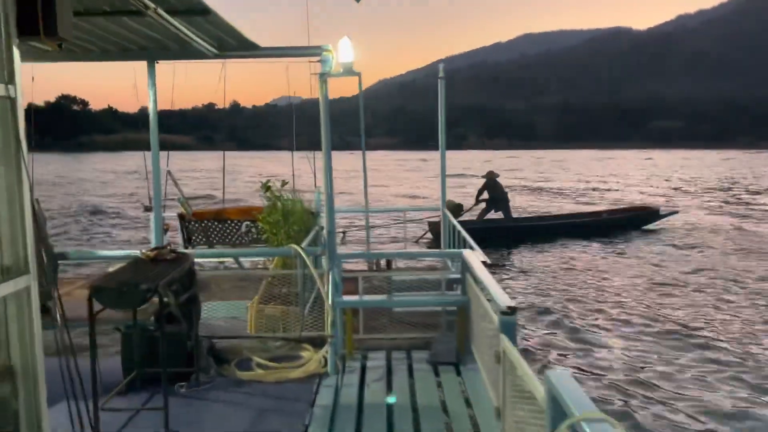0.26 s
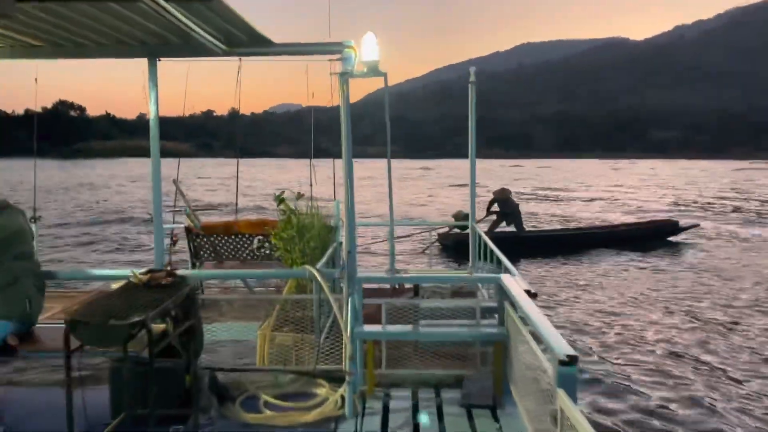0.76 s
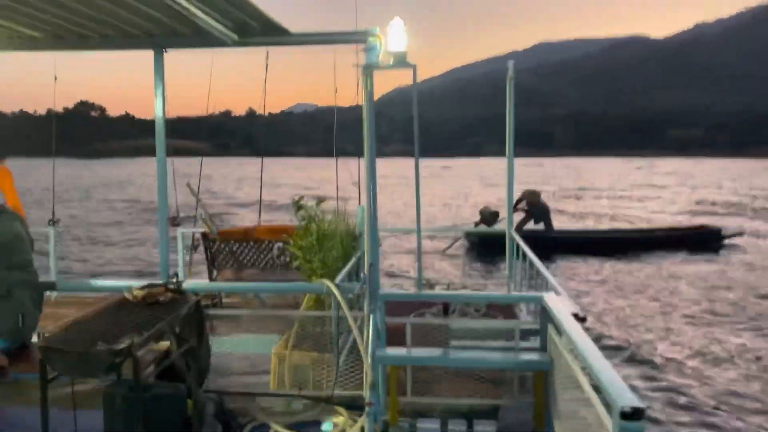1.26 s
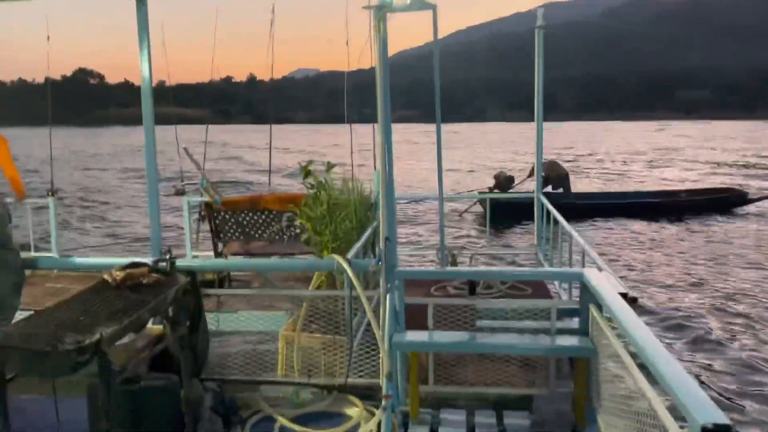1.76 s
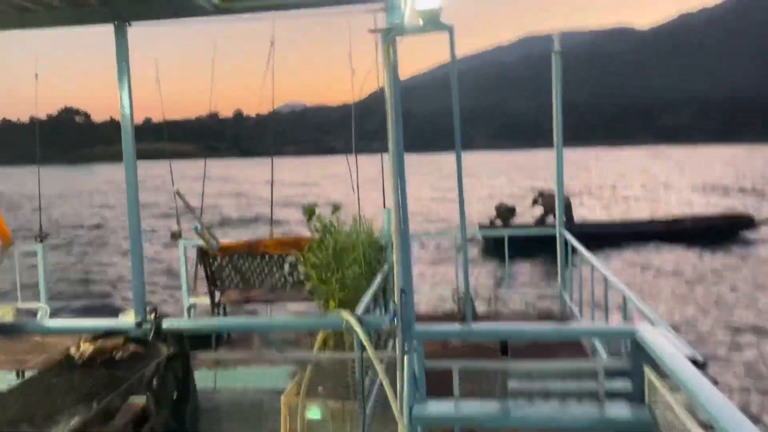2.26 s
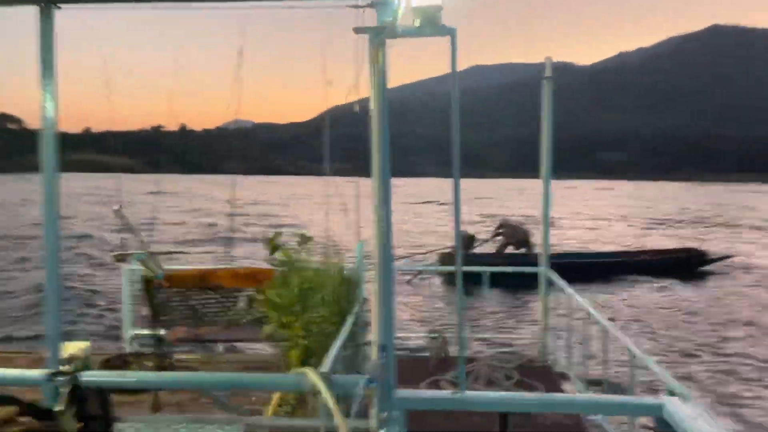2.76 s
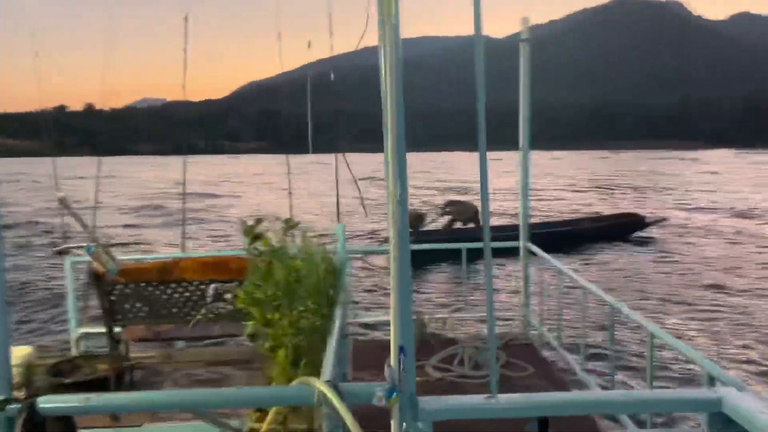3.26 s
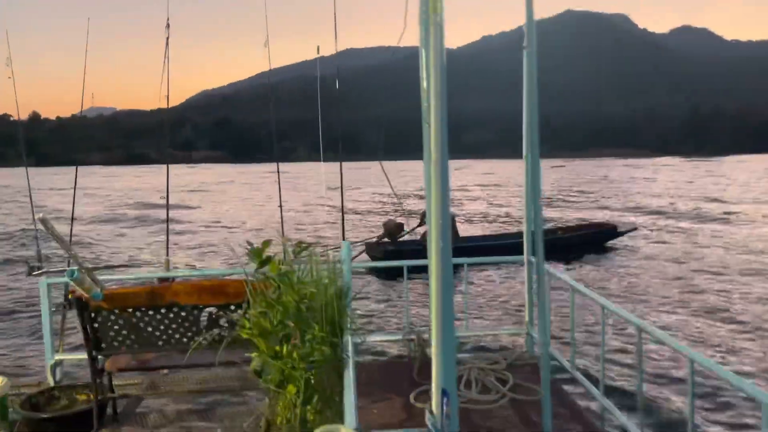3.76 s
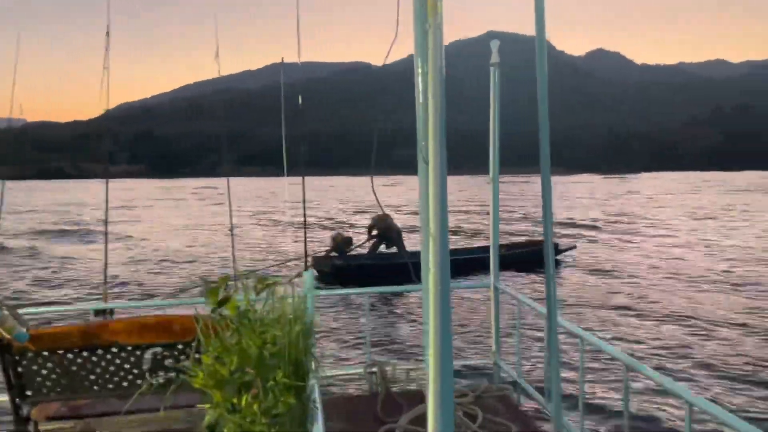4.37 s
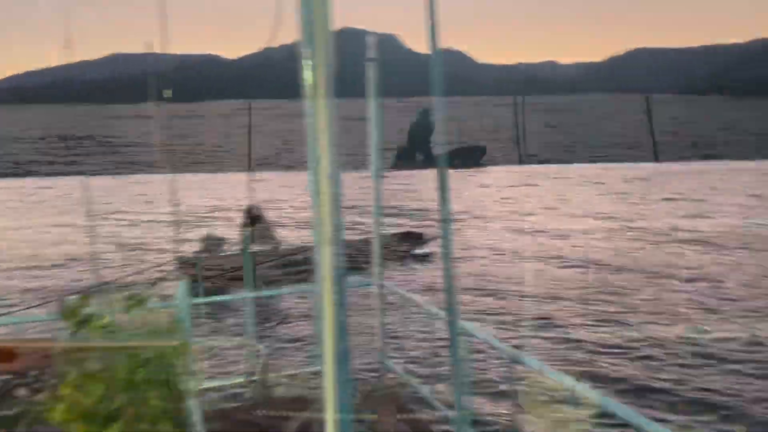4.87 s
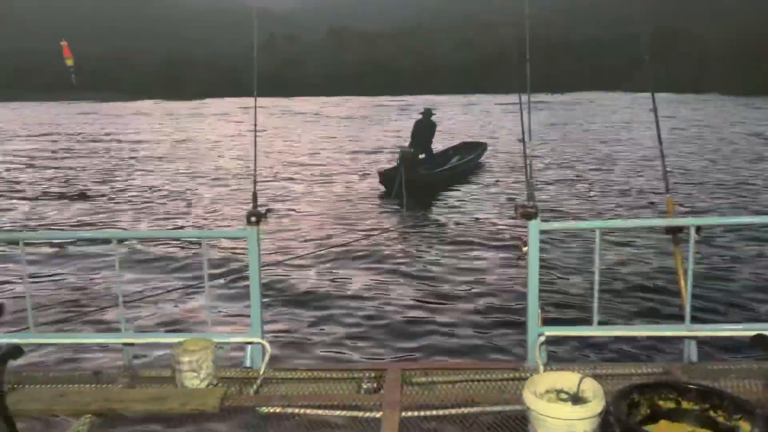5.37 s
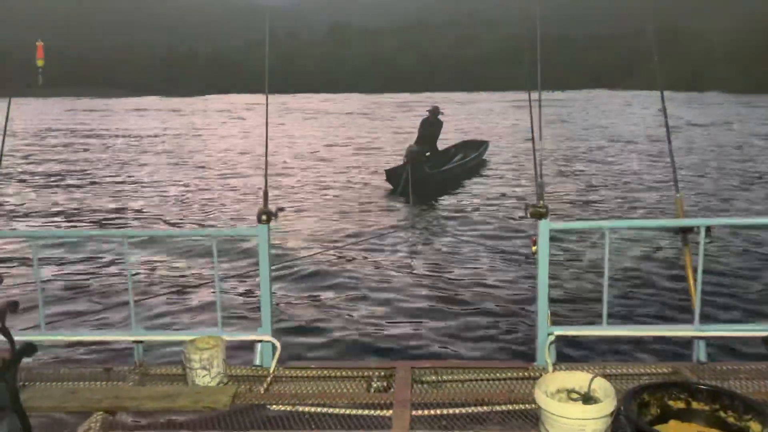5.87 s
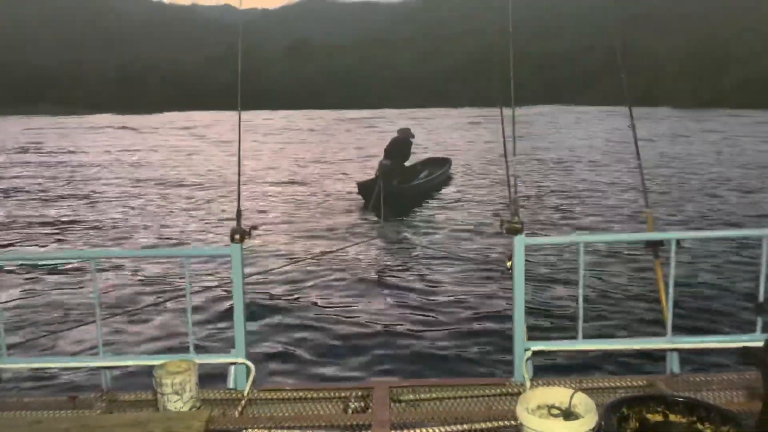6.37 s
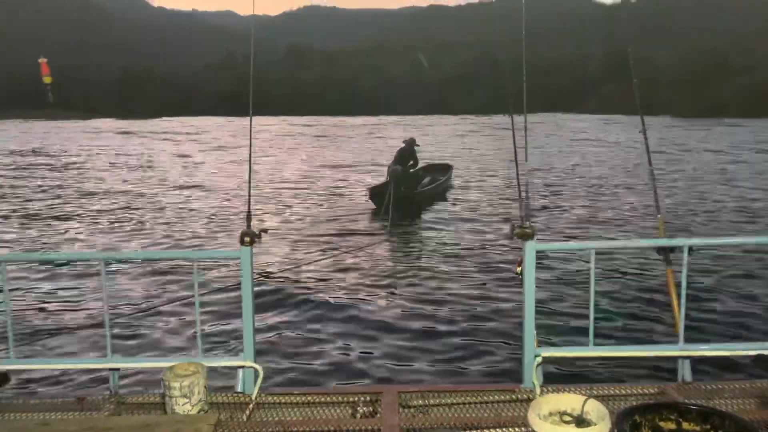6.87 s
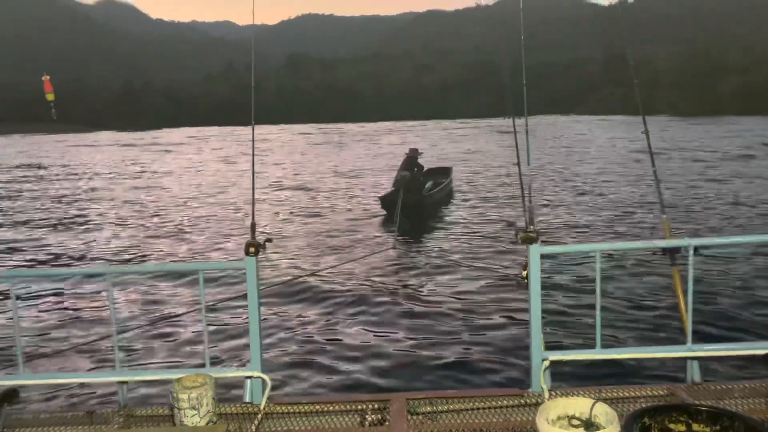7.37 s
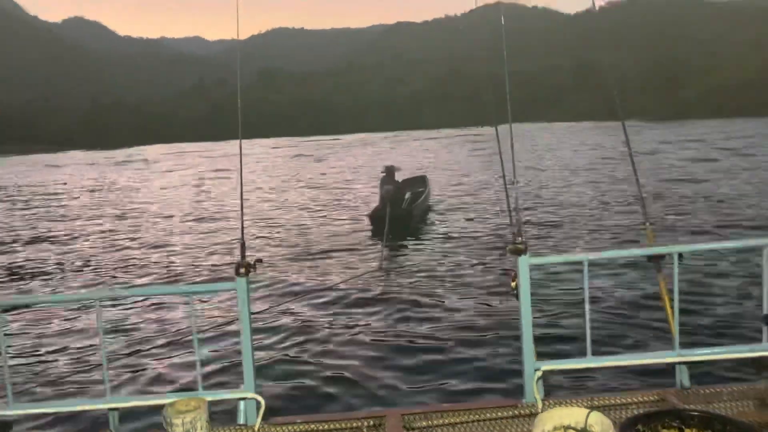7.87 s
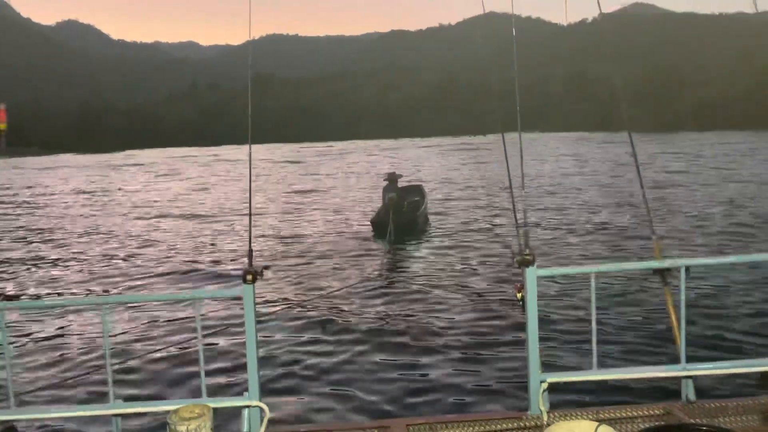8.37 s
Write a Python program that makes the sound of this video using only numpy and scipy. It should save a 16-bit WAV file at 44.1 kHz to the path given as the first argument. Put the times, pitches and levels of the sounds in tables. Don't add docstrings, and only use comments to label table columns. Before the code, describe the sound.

On the deck of a towed raft, a stereo microphone hears a boat motor chugging across open water: rapid, slightly uneven cracks, ringing metal, shaft hum and short exhaust thumps. Loose fittings knock softly now and then. The motor eases off before five seconds, then blends into a louder, rounder, bassier putter facing the pipe, dipping and briefly surging near the end. Spray, wash and wind rumble continue throughout.

```python
import sys
import numpy as np
from scipy import signal
from scipy.fft import rfft, irfft, next_fast_len
from scipy.io import wavfile
from scipy.ndimage import uniform_filter1d

SR = 44100
rng = np.random.default_rng(int(sys.argv[2]) if len(sys.argv) > 2 else 0)


def to_wav(s):
    ch = np.atleast_2d(s).T
    pcm = np.round(np.clip(ch, -1, 1) * 32767)
    wavfile.write(sys.argv[1], SR, pcm.astype(np.int16))


def boost_factor(decibels):
    exponent = np.asarray(decibels, float) / 20
    return 10 ** exponent


N = 380141

# f/Hz, phase/rad
LEAD_SIDE = [(0, 0), (780, 0.3), (2070, -0.4), (2760, 0.3), (8180, 0.3), (8790, -0.3), (9730, -2.5),
             (10600, -3.5), (11700, -6.1), (12700, -6.6), (13400, -9.3), (14200, -9.4), (15200, -12.4),
             (16700, -12.8)]
# f/Hz, level/dB
TILT_SIDE = [(60, 0.59), (180, 0), (550, 0.37), (1650, 1.0), (4970, 1.0), (15000, 0.58)]
# f/Hz, likeness/0..1
DIRECT = [(60, .95), (500, .96), (1300, .85), (2500, .92), (6000, .86), (8500, .995)]


def engine_side():
    # t/s, rate/(firings per s)
    speed = [(.0417, 19.037), (1.287, 19.713), (2.009, 17.84), (2.392, 17.94), (3.405, 17.597),
             (4.279, 16.764), (4.463, 15.896), (4.635, 13.516), (4.87, 12.322)]
    # t/s, exhaust pulse level/dB, gas crack level/dB, crack fullness/dB
    effort = [
        (.04, 0.5, -12, -12),
        (.75, -0.5, -11.5, -10.5),
        (1.4, -1.5, -11.5, -12),
        (2.0, -2.5, -17, -8),
        (2.8, -1.5, -12, -14.5),
        (3.4, -.6, -15.5, -8.5),
        (4.2, -0.5, -13.5, -11.5),
        (4.45, -1, -19, -7.5),
        (4.65, -1.5, -32.5, -17),
    ]
    # crack/dB, fullness/dB
    uneven = (1.3, 1.2)
    # f/Hz, level/dB
    colour = [(400, -10), (750, -12), (1000, -15.5), (2000, -6), (4000, -3), (4500, -3), (6500, -8.5),
              (8000, -6), (9300, -3.5), (10300, 8.5), (11500, -2), (12500, -14.5), (13800, -24),
              (15400, -29.5), (16700, -52)]
    # (f/Hz, width/Hz, level/dB)
    rings = [
        (0, [(2730, 320, 3.5), (5100, 140, -10), (5800, 52, 12), (7300, 1900, 0)]),
        (1.2, [(4950, 790, -38), (7700, 130, 12), (8520, 240, 9.5), (9470, 370, 8.5)]),
        (2.55, [(2280, 180, 1), (3900, 370, 12), (6030, 320, 8.5), (7500, 490, 0)]),
        (3.22, [(2850, 150, 0), (4570, 110, -20), (6300, 270, 5), (8700, 310, -0.5)]),
    ]
    # f/Hz, level/dB, t60/s, sign
    pipe = [(91.5, -24.3, .07, 1), (194, -13.9, .016, 1), (359, -30.3, .035, -1)]
    # delay/s, f/Hz, length/cycles, level/dB
    knocks = [
        (.0003, 390, .5, -19.5),
        (.0065, 89, .39, -22),
    ]
    multiples = [9, 13, 15, 16, 19, 21, 24, 27, 30, 33]
    hum_db = [-46, -52, -44, -50, -45, -50, -49, -46, -51, -53]
    fired = firings(speed, effort, uneven)
    gas = cracks(fired, colour, rings, rise_s=0.0022, fall_s=0.0027, tail_db=-8.5, tail_s=0.012,
                 crack_db=-2.0, ring_db=-3.5)
    pulses = thumps(fired, pipe, knocks, delay_s=.0082, soft_s=.0002, vary=.008)
    body = driven(hum(pulses, fired, multiples, hum_db), effort)
    return ports(gas + body, DIRECT, LEAD_SIDE, TILT_SIDE)


def engine_behind():
    # t/s, rate/(firings per s)
    speed = [(4.874, 17.021), (5.217, 16.785), (5.695, 17.02), (5.879, 17.61), (7.031, 17.275),
             (7.584, 17.604), (7.806, 16.179), (8.356, 18.865), (8.627, 17.984)]
    # t/s, exhaust pulse level/dB, gas crack level/dB, crack fullness/dB
    effort = [
        (4.87, -18, -26.5, -9),
        (5.05, -4.5, -16.5, -5),
        (5.3, 2, -10, -4.5),
        (5.85, 0.7, -10.5, -3.5),
        (6.4, -0.5, -13.5, -7),
        (6.85, 0, -11, -8),
        (7.65, -0.5, -16.5, -7.5),
        (8.0, 0.5, -9, -6.5),
        (8.6, .6, -12, -3),
    ]
    # crack/dB, fullness/dB
    uneven = (1.1, 1.2)
    # f/Hz, level/dB
    colour = [(400, 0.5), (800, -1.5), (1000, -5), (2000, 1), (4000, 5), (4500, -5), (6500, -3.5),
              (8000, -8), (9300, -0.5), (10300, 5), (11500, -5.5), (12500, -19.5), (13800, -26),
              (15400, -37), (16700, -60)]
    # (f/Hz, width/Hz, level/dB)
    rings = [
        (4.8, [(978, 80, 5), (2155, 93, 5), (5570, 160, 7), (7850, 98, 6), (8930, 420, -2)]),
        (6.2, [(983, 60, 8), (2010, 500, 11), (4520, 170, 12), (7150, 170, -20), (7800, 390, 6)]),
        (7.7, [(1357, 81, 8.5), (3340, 240, -14), (5900, 330, -2), (8360, 300, -2)]),
    ]
    # f/Hz, level/dB, t60/s, sign
    pipe = [(91.4, -15.2, .09, 1), (154, -9.3, .05, 1), (337, -6.5, .12, -1)]
    # delay/s, f/Hz, length/cycles, level/dB
    knocks = [
        (.0004, 575, 1.0, -18.5),
        (.0065, 126, .43, -18.8),
    ]
    multiples = [9, 13, 15, 17, 20, 27]
    hum_db = [-45, -47, -51, -52, -51, -57]
    # f/Hz, phase/rad
    lead_behind = [(0, 0), (1460, -0.1), (3190, 1.2), (6120, 0.2), (7920, 0.7), (8790, -0.3), (9730, -2.3),
                   (11700, -5.9), (12700, -6.7), (13400, -9.4), (14500, -9.6), (15200, -12.7),
                   (15700, -12.5), (16700, -13.5)]
    # f/Hz, level/dB
    tilt_behind = [(60, 0.3), (130, -1.5), (290, 2), (640, -0.2), (1410, -5), (3100, 0.8), (6820, 3),
                   (15000, -2)]
    fired = firings(speed, effort, uneven)
    gas = cracks(fired, colour, rings, rise_s=0.0025, fall_s=0.0037, tail_db=-13.5, tail_s=0.017,
                 crack_db=-1.5, ring_db=-3.0)
    pulses = thumps(fired, pipe, knocks, delay_s=.0084, soft_s=.0013, vary=.01)
    body = driven(hum(pulses, fired, multiples, hum_db), effort)
    return ports(gas + body, DIRECT, lead_behind, tilt_behind)


def firings(speed, effort, uneven):
    s, rate = np.transpose(speed)
    t = np.arange(s[0], s[-1], 1 / SR)
    cycles = np.cumsum(np.interp(t, s, rate)) / SR
    times = np.interp(np.arange(int(cycles[-1]) + 1), cycles, t)
    at, _, crack_db, full_db = np.transpose(effort)
    luck = rng.standard_normal((len(times), 2)).clip(-2, 2) * uneven
    high_db = np.interp(times, at, crack_db) + luck[:, 0]
    low_db = high_db + np.interp(times, at, full_db) + luck[:, 1] - luck[:, 0] / 2
    return np.transpose([times, high_db, low_db])


def cracks(fired, colour, rings, rise_s, fall_s, tail_db, tail_s, crack_db, ring_db):
    t = np.arange(3000) / SR
    rise = np.sin(np.pi / 2 * np.clip(t / rise_s, 0, 1)) ** 2
    late = np.maximum(t - rise_s, 0)
    burst, tail = np.exp(-2 * late / fall_s), boost_factor(2 * tail_db) * np.exp(-2 * late / tail_s)
    shape = rise * np.sqrt(burst + tail)
    gas = noise(colour, patchy_db=2.8, flicker_db=.3, size=256)
    above_4500 = signal.firwin(255, 4500, pass_zero=False, fs=SR)
    high = signal.oaconvolve(gas, above_4500[None], "same")
    low = gas - high
    gate = np.zeros((2, N))
    for s, high_db, low_db in fired:
        add(gate, s - .003, boost_factor([[high_db], [low_db]]) * shape)
        leak = boost_factor(low_db - 22.5) * np.hanning(500)
        add(gate[1], max(s - .012, 0), leak)
    out = boost_factor(crack_db) * (gate[0] * evened(high) + gate[1] * evened(low))
    starts = [round(s * SR) for s, _ in rings] + [N]
    for a, b, (_, modes) in zip(starts, starts[1:], rings):
        ring = np.zeros(len(t))
        for hz, width, db in modes:
            decay = np.exp(-np.pi * width * t)
            ring += boost_factor(db + ring_db) * width / SR * decay * np.cos(2 * np.pi * hz * t)
        add(out, a / SR, signal.oaconvolve(out[:, a:b], 2 * np.pi * ring[None]))
    return out


def thumps(fired, pipe, knocks, delay_s, soft_s, vary):
    t, out = np.arange(5000) / SR, np.zeros(N)
    puff = np.exp(-.5 * ((t[:400] - t[200]) / soft_s) ** 2)
    puff /= puff.sum()
    for s, crack_db, _ in fired:
        luck = rng.standard_normal(5)
        ring = np.zeros(len(t))
        for k, (hz, level, t60, sign) in enumerate(pipe):
            tuned = hz * (1 + vary * luck[k])
            ring += sign * boost_factor(level - 60 * t / t60) * np.sin(2 * np.pi * tuned * t)
        add(out, s + delay_s - t[200], np.convolve(ring, puff))
        idle_db = .9 * min(crack_db + 19, 0)
        for k, (late, hz, cycles, level) in enumerate(knocks):
            u = (t[:1200] - t[600]) * hz * (1 + 2 * vary * luck[3 + k])
            kick = np.cos(2 * np.pi * u) * np.exp(-(u / cycles) ** 2)
            add(out, s + late - t[600], -boost_factor(level + idle_db * (k == 0)) * kick)
    return out


def hum(pulses, fired, multiples, hum_db):
    # t/s, level/dB
    shaft_load = [
        (0, -4),
        (1.5, -1),
        (3, -5),
        (4.4, -2),
        (4.7, -10),
        (5.2, 6.5),
        (6.2, 3.5),
        (7.8, 3.5),
        (8.6, 2),
    ]
    out, times = pulses.copy(), fired[:, 0]
    turns = np.interp(np.arange(N) / SR, [times[0] - .054, *times], np.arange(len(times) + 1))
    running = uniform_filter1d(np.gradient(turns) > 0, size=2000, output=float)
    strength = running * curve(shaft_load, column=1)
    for multiple, db in zip(multiples, hum_db):
        spin = np.exp(2j * np.pi * multiple * turns)
        in_step = np.vdot(spin, out * running)
        drift = np.interp(np.arange(N), np.linspace(0, N, 40), rng.standard_normal(40))
        tone = np.sqrt(2) * boost_factor(db) * (spin * in_step / abs(in_step)).real
        out += strength * boost_factor(1.8 * drift) * tone
    return out


def driven(body, effort):
    low_cut = signal.butter(3, 60, "high", fs=SR, output="sos")
    return signal.sosfilt(low_cut, body * curve(effort, column=1)) * np.array([[1], [.5]])


def deck():
    # t/s, f/Hz, peak level/dB, t60/s
    bumps = [(1.155, 85, -49, 0.22), (1.573, 150, -21, 0.068), (1.605, 279, -19, 0.098),
             (1.874, 270, -19, 0.14), (1.93, 249, -23, .1), (2.169, 103, -17, 0.21),
             (2.328, 103, -21, 0.39), (3.698, 76.4, -26, 0.33), (3.928, 79.5, -18, 0.099),
             (5.623, 990, -25, .06), (5.641, 977, -15, 0.079)]
    t, out = np.arange(12000) / SR, np.zeros((2, N))
    for s, hz, db, t60 in bumps:
        soft_start = 1 - np.exp(-t * hz)
        add(out[0], s, soft_start * boost_factor(db - 60 * t / t60) * np.sin(2 * np.pi * hz * t))
    return out


def water():
    # t/s, level/dB
    nearness = [
        (0, 0.5),
        (1.4, -1.5),
        (2.9, 2),
        (4.1, 0.5),
        (4.75, -5.5),
        (5.3, 1.5),
        (5.8, 3.5),
        (6.3, 0),
        (8.62, 0.5),
    ]
    # f/Hz, level/dB
    spray_colour = [(1500, -16.5), (3000, -18), (5000, -14), (8000, -15.5), (9300, -10), (10300, 0),
                    (11500, -20), (12500, -58), (13500, -55)]
    # f/Hz, level/dB
    wash_colour = [(300, 5), (600, 2), (800, -8.5), (980, -3.5), (1100, -1.5), (1500, -6), (2200, -7),
                   (3500, -15), (6000, -54)]
    near = curve(nearness, column=1)
    hiss = boost_factor(-37.5) * near * noise(spray_colour, patchy_db=4.5, flicker_db=1.0)
    wash = boost_factor(-37.5) * near ** 0.65 * noise(wash_colour, patchy_db=1.0, flicker_db=3.0)
    return hiss + wash


def wind():
    # t/s, length/s, level over the calm/dB
    gusts = [(.4, .5, 3.5), (.95, 0.39, 7), (1.177, 0.052, 3.5), (1.56, 0.27, 2.5), (1.91, 0.091, 8.5),
             (2.25, 0.5, 3), (3.032, 0.12, 6), (3.71, .12, 1), (3.9, 0.23, 3), (4.38, .2, 5),
             (4.75, .4, -5), (5.75, 0.41, 3.5), (7.97, 0.38, -1)]
    # f/Hz, level/dB
    rumble_colour = [(28, -34), (48, -3), (70, 0), (130, -4), (200, -9), (400, -20), (630, -22), (800, -30),
                     (1200, -40)]
    t = np.arange(N) / SR
    level_db = np.full(N, -36.5)
    for s, length, db in gusts:
        level_db += db * np.exp(-(2 * (t - s) / length) ** 2)
    return boost_factor(level_db) * noise(rumble_colour, patchy_db=2.0, flicker_db=2.5, size=1024)


def noise(colour, patchy_db, flicker_db, size=512):
    hop = size // 4
    frames, hz = N // hop + 5, np.fft.rfftfreq(size, 1 / SR)
    a, b, c, d, patches = rng.standard_normal((frames, len(hz), 5)).T
    patches = uniform_filter1d(patches, size=6, axis=0)
    patches = evened(uniform_filter1d(patches, size=16, axis=1))
    flicker = evened(uniform_filter1d(rng.standard_normal(frames), size=4))
    level_db = read(colour, hz)[:, None] + patchy_db * patches + flicker_db * flicker
    z = np.array([a + 1j * b, c + 1j * d]) * boost_factor(level_db)
    return evened(signal.istft(z, nperseg=size, noverlap=size - hop)[1][:, :N])


def ports(x, likeness, lead, tilt):
    size = next_fast_len(N)
    hz, (a, b) = np.fft.rfftfreq(size, 1 / SR), rfft(x, size)
    c = np.clip(read(likeness, hz), 0, 1)
    half = boost_factor(read(tilt, hz) / 2) * np.exp(.5j * np.interp(hz, *np.transpose(lead)))
    same, apart = np.sqrt((1 + c) / 2) * a, np.sqrt((1 - c) / 2) * b
    return irfft([(same + apart) * half, (same - apart) / half], size)[:, :N]


def curve(rows, column):
    rows = np.asarray(rows)
    return boost_factor(np.interp(np.arange(N) / SR, rows[:, 0], rows[:, column]))


def read(points, hz):
    f, value = np.transpose(points)
    return np.interp(np.log(hz + 1), np.log(f + 1), value)


def evened(x):
    return x / np.sqrt(np.mean(x ** 2) + 1e-20)


def add(mix, s, sound):
    part = mix[..., round(s * SR):][..., :sound.shape[-1]]
    part += sound[..., :part.shape[-1]]


def scene():
    # f/Hz, likeness/0..1
    diffuse = [(40, .86), (400, .88), (800, .72), (1500, .5), (3000, .6), (6500, .6), (8500, .97),
               (9500, .995)]
    engine = engine_side() + engine_behind()
    return engine + ports(wind() + water() + deck(), diffuse, LEAD_SIDE, TILT_SIDE)


def starved(x, luck_db):
    # f/Hz, level/dB
    floor = [(8000, -110), (9800, -68), (11500, -66), (13000, -59), (16300, -59), (16900, -20)]
    hz, _, z = signal.stft([x[0] + x[1], x[0] - x[1]], SR, nperseg=256)
    power = uniform_filter1d(abs(z) ** 2, size=7, axis=1)
    band_db = 10 * np.log10(uniform_filter1d(power, size=3, axis=2) + 1e-20)
    luck = rng.standard_normal((2, 1, z.shape[2] // 4 + 1))
    luck = np.repeat(luck, 4, axis=2)[..., :z.shape[2]]
    heard = band_db > read(floor, hz)[:, None] + luck_db * luck
    both, apart = signal.istft(z * heard, SR, nperseg=256)[1][:, :N]
    return np.array([both + apart, both - apart]) / 2


def band_limit(x):
    return signal.sosfilt(signal.butter(12, 17130, fs=SR, output="sos"), x)


def record(dry):
    low_cut = signal.butter(2, 40, "high", fs=SR, output="sos")
    held = .78 * np.tanh(signal.sosfilt(low_cut, dry) / .78)
    return band_limit(starved(held, luck_db=5.5))


dry = scene()
out = record(dry)
to_wav(out)
```